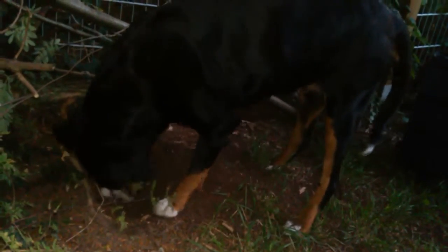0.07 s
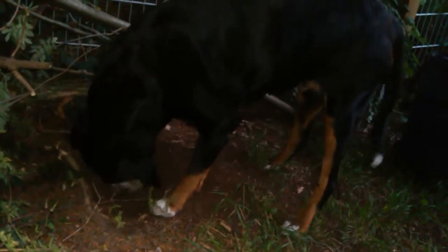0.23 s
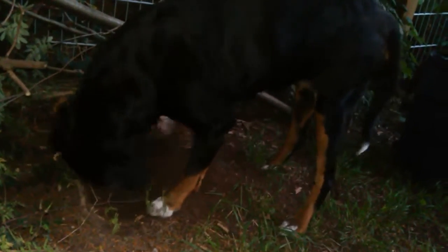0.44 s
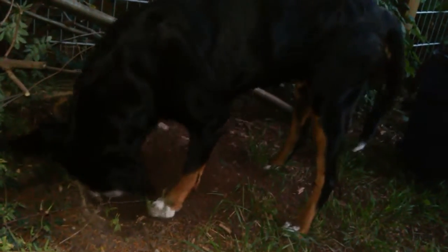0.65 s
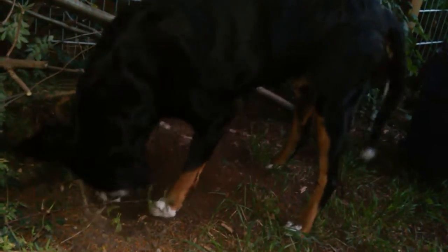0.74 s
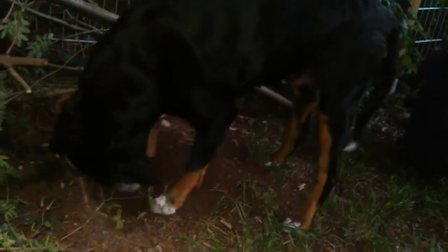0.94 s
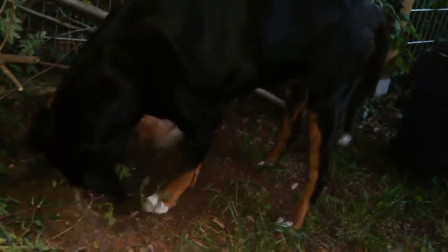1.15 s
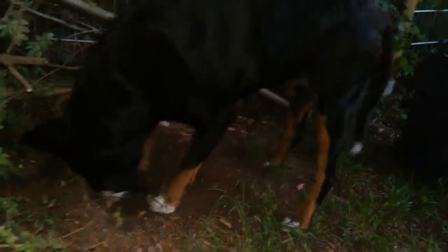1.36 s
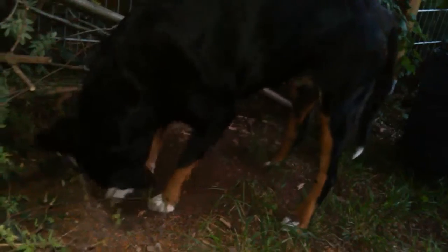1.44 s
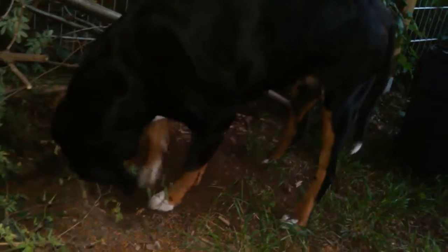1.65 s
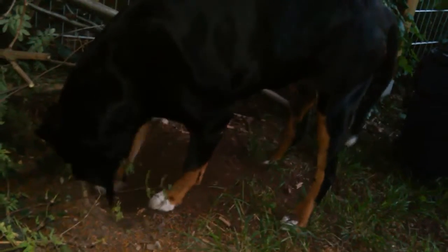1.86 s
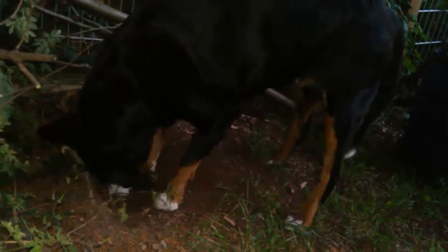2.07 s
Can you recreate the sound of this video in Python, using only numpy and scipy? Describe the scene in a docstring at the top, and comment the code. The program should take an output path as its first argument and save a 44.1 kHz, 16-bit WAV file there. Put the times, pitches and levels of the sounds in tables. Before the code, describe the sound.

A dog digs in dry soil, close by, over a faint outdoor rumble. At 0.2 seconds a paw thumps and rakes, spraying hissing grit; a twig snaps near 0.6. A pat at 0.7 leads into a lighter stroke with clinking gravel, ticking grains and more snaps. A harder rake comes around 1.6, its grit dying away before a paw settles and stalks crack at 2 seconds.

```python
"""A dog digs in dry garden soil, close by, outdoors, over a faint rumble.
A forepaw thumps in and rakes through the crumbs; grit sprays with a hiss and a twig snaps.
A paw pats the ground, then a lighter stroke drags up clinking gravel and more grit.
A second, harder rake follows; the last grains land, a paw settles and dry stalks snap."""
import sys
import numpy as np
from scipy import signal
from scipy.fft import rfft, irfft
from scipy.io import wavfile

SR = 44100
rng = np.random.default_rng(int(sys.argv[2]) if len(sys.argv) > 2 else 0)


def digitize_waveform(pressure):
    """Quantize a signal to 16-bit integers and store it at the path in sys.argv[1].

    Rows of a 2-D input are taken as channels; values are limited to [-1, 1].
    """
    field = np.atleast_2d(pressure).T
    bounded = np.clip(field, -1, 1)
    quanta = np.round(bounded * 32767).astype(np.int16)
    wavfile.write(sys.argv[1], SR, quanta)


N = 92610
T = np.arange(N) / SR


def from_db(db):
    """Decibels to gain."""
    return 10 ** (np.asarray(db) / 20)


def unit_rms(x):
    """Scale to unit power."""
    return x / np.sqrt(np.mean(x ** 2) + 1e-20)


def butter(x, order, hz, kind):
    """Butterworth filter."""
    return signal.sosfilt(signal.butter(order, hz, kind, fs=SR, output="sos"), x)


def colour(x, spectrum):
    """Minimum-phase filter with the given spectral shape and unit power gain."""
    hz, db = np.transpose(spectrum)
    size = 2 * N
    bin_hz = np.maximum(np.arange(N + 1) * SR / size, 1)
    gain = unit_rms(from_db(np.interp(np.log(bin_hz), np.log(hz), db)))
    cepstrum = irfft(np.log(gain))
    cepstrum[1:N] *= 2  # fold onto positive time
    cepstrum[N + 1:] = 0
    return irfft(rfft(x, size) * np.exp(rfft(cepstrum)))[:N]


def resonate(x, hz, width_hz):
    """One resonance, unit power gain for white noise."""
    r = np.exp(-np.pi * width_hz / SR)
    feedback = [1, -2 * r * np.cos(2 * np.pi * hz / SR), r * r]
    return signal.lfilter(np.sqrt((1 - r * r) / 2) * np.array([1, 0, -1]), feedback, x)


def bursts(rows, t60_s):
    """Envelope of decaying hits (time [s], level [dB])."""
    return sum((T >= s) * from_db(db - 60 * np.maximum(T - s, 0) / t60_s) for s, db in rows)


def strokes(rows, fade_db_per_s):
    """Envelope of paw strokes (start [s], rise [s], hold [s], level [dB]): bite, swell, hold, fade."""
    out = 0
    for start_s, rise_s, hold_s, db in rows:
        age_s = T - start_s
        bite = np.clip(age_s / 0.0048, 0, 1)
        swell_db = -8 * np.clip(1 - age_s / rise_s, 0, 1)
        fade_db = fade_db_per_s * np.maximum(age_s - rise_s - hold_s, 0)
        out += bite * from_db(db + swell_db - fade_db)
    return out


def impacts(per_s, spread_db, grain_s):
    """Power of random tiny impacts of uneven size; mean 1."""
    hits = rng.random(N) < per_s / SR
    energy = from_db(spread_db * np.minimum(rng.exponential(1, N), 4)) ** 2
    power = signal.lfilter([1], [1, -np.exp(-1 / (grain_s * SR))], hits * energy + 1e-12)
    return power / power.mean()


def grains(per_s, spread_db, grain_s, wide_share):
    """Crunch: some grains crack across all bands, the others sound in one."""
    edges_hz = [30, 700, 1500, 2700, 4200, 6000, 8000, 10000, 12000, 14000, 17000]
    wide = impacts(per_s, spread_db, grain_s)
    out = 0
    for band_hz in zip(edges_hz, edges_hz[1:]):
        narrow = impacts(per_s / 2, spread_db, 2 * grain_s)
        power = wide_share * wide + (1 - wide_share) * narrow
        out += butter(np.sqrt(power) * rng.standard_normal(N), 2, band_hz, "band")
    return unit_rms(out)


def ring(rows, modes):
    """Each contact (time [s], level [dB]) rings all modes, slightly varied in pitch and level."""
    out = np.zeros(N)
    for s, db in rows:
        age_s = np.maximum(T - s, 0)
        for hz, mode_db, t60_s in modes:
            pitch_hz = hz * rng.normal(1, .006)
            level_db = rng.normal(db + mode_db, 1)
            out += from_db(level_db - 60 * age_s / t60_s) * np.sin(2 * np.pi * pitch_hz * age_s)
    return out


# yard background: (frequency [Hz], relative density [dB])
YARD_SPECTRUM = [(20, 0), (45, -4), (100, 1.5), (170, -7.5), (300, -18), (1000, -21.5), (4000, -73),
                 (15000, -30)]

def yard():
    """Faint steady rumble."""
    return from_db(-58) * colour(rng.standard_normal(N), YARD_SPECTRUM)


def echo(x):
    """Brief scatter from ground and shrubs."""
    scatter = rng.standard_normal(N) * bursts([(.004, 0)], t60_s=0.13)
    return from_db(-13.5) * signal.fftconvolve(x, scatter / np.linalg.norm(scatter))[:N]


# earth sliding: (start [s], rise [s], hold [s], level [dB])
SLUMPS = [(0.23, 0.039, 0.097, -45), (0.798, 0.064, 0.18, -56), (1.585, .03, .05, -40)]
# sliding earth: (frequency [Hz], relative density [dB])
SLUMP_SPECTRUM = [(35, -5.5), (72, -1), (110, 4), (170, -8), (300, -18), (1500, -64)]

def slumps():
    """Loosened earth slumps with a low murmur."""
    return colour(strokes(SLUMPS, fade_db_per_s=131) * rng.standard_normal(N), SLUMP_SPECTRUM)


# paw falls: (time [s], scuff [dB], crumbs [dB])
STEPS = [(0.724, -42, -58), (0.736, -49.5, -60), (1.354, -53.5, -63), (1.972, -50.5, -51)]
# paw on soil: (frequency [Hz], relative density [dB])
SCUFF_SPECTRUM = [(100, -19), (230, 7.5), (370, -16), (550, 2.5), (780, -9.5), (1100, -18.5), (3000, -17.5)]
# breaking crumbs, also in rakes(): (frequency [Hz], relative density [dB])
CRUMB_SPECTRUM = [(150, -3.5), (400, 1), (750, 1), (1150, 0), (1800, -2.5), (2600, 1), (4200, -2.5),
                  (5000, -14), (6500, -3), (9000, -22.5), (15000, -32)]

def steps():
    """A settling paw scuffs the ground and crunches loose crumbs."""
    scuff = bursts([(s, db) for s, db, _ in STEPS], t60_s=.11) * rng.standard_normal(N)
    crunch = bursts([(s, db) for s, _, db in STEPS], t60_s=.2)
    crunch *= grains(per_s=420, spread_db=3, grain_s=0.00037, wide_share=0.28)
    return colour(scuff, SCUFF_SPECTRUM) + colour(crunch, CRUMB_SPECTRUM)


# twigs and stalks breaking: (time [s], body [Hz], body level [dB], crack [Hz], crack level [dB])
SNAPS = [(.149, 3350, -72, 4500, -55), (0.5804, 1680, -41, 3980, -37), (0.5797, 1800, -36, 5940, -35),
         (.7775, 1670, -28.5, 3200, -36), (0.8286, 1870, -34.5, 2500, -35),
         (1.0397, 3070, -34.5, 5730, -29.5), (1.534, 1030, -38.5, 3070, -37), (1.540, 990, -34, 1500, -44),
         (1.973, 734, -40.5, 1820, -43), (1.9749, 2670, -42.5, 4740, -42.5)]

def twigs():
    """Fibres break in a burst that rings in the twig's body and in a higher crack."""
    out = 0
    for s, body_hz, body_db, crack_hz, crack_db in SNAPS:
        fibres = bursts([(s, 0)], t60_s=.012) * rng.standard_normal(N)
        body = from_db(body_db) * resonate(fibres, body_hz, width_hz=200)
        crack = from_db(crack_db) * resonate(fibres, crack_hz, width_hz=.2 * crack_hz)
        out += butter(2 * (body + crack), 2, [body_hz / 2, 2 * crack_hz], "band")
    return out


# grain landings: (time [s], level [dB])
TICKS = [(.159, -37), (.3055, -17.5), (.466, -23), (1.021, -20), (1.088, -21.5), (1.116, -25),
         (1.319, -39.5), (1.348, -44), (1.829, -33), (1.917, -39), (1.974, -33)]
# landing grit, also in spray(): (frequency [Hz], relative density [dB])
GRIT_SPECTRUM = [(200, -24), (500, -17), (1200, -22.5), (1900, -15), (3500, -14), (5000, -15.5), (6500, -7),
                 (8000, -9.5), (9200, -4.5), (11500, 0), (13300, 3.5), (15700, -1.5)]

def ticks():
    """Larger grains land with a dry tick."""
    return colour(bursts(TICKS, t60_s=0.043) * rng.standard_normal(N), GRIT_SPECTRUM)


# flying grit: (time [s], level [dB])
SPRAY_ENVELOPE = [(0.01, -34), (0.13, -46.5), (0.22, -29.5), (0.46, -30.5), (0.47, -27), (0.5, -30.5),
                  (0.62, -40), (0.76, -30), (0.78, -25), (0.79, -26.5), (0.83, -21), (1.01, -32.5),
                  (1.03, -34), (1.05, -31.5), (1.15, -36), (1.2, -46), (1.29, -53.5), (1.35, -41.5),
                  (1.37, -44.5), (1.5, -33), (1.55, -26.5), (1.72, -21.5), (1.85, -43.5), (1.96, -53.5),
                  (2.0, -39.5), (2.09, -53.5)]

def spray():
    """Flung grit hisses on soil and leaves; coarser grains tick through."""
    s, db = np.transpose(SPRAY_ENVELOPE)
    envelope = from_db(np.interp(T, s, db) - 0.5)
    fine = grains(per_s=5400, spread_db=5.0, grain_s=0.0004, wide_share=0.52)
    coarse = np.sqrt(impacts(per_s=110, spread_db=4.5, grain_s=0.0002)) * rng.standard_normal(N)
    return colour((fine + from_db(-9.5) * coarse) * envelope, GRIT_SPECTRUM)


# claws through gravel: (start [s], rise [s], hold [s], level [dB])
GRAVEL_STROKES = [(0.789, 0.037, 0.016, -25), (0.874, .005, .008, -38.5), (0.918, 0.0076, 0.0099, -33.5),
                  (1.002, .006, .01, -38.5), (1.438, .008, .008, -55), (1.496, .008, 0.014, -38.5)]
# rattling gravel: (frequency [Hz], relative density [dB])
GRAVEL_SPECTRUM = [(300, -38), (700, -15), (1200, -23), (1750, 1), (2500, -0.5), (4000, -7), (5200, 1.5),
                   (6500, 6.5), (7800, -5.5), (9200, 10.5), (12000, 5.5), (15500, -4.5)]
# pebble contacts: (time [s], level [dB])
CLINKS = [(.7685, -13), (.776, -13), (.7829, -3.5), (.809, -13), (.8275, -11.5), (.8453, -5.5), (.901, -29)]
# pebble resonances: (frequency [Hz], level [dB], t60 [s])
PEBBLE_MODES = [(6530, -5, .018), (9200, -0.5, 0.011), (10150, -6, 0.01), (11020, -7, 0.018),
                (14950, -8, 0.02)]

def gravel(clink_rise_s=0.00022):
    """Gravel rattles under the claws; single pebbles clink."""
    drag = strokes(GRAVEL_STROKES, fade_db_per_s=190)
    rattle = drag * grains(per_s=420, spread_db=3.5, grain_s=0.00047, wide_share=0.5)
    clinks = sum(np.clip((T - s) / clink_rise_s, 0, 1) * ring([(s, db)], PEBBLE_MODES)
                 for s, db in CLINKS)
    return colour(rattle, GRAVEL_SPECTRUM) + butter(clinks, 3, 5000, "high")


# deep paw strokes: (start [s], rise [s], hold [s], thud [dB], crumbs [dB])
RAKES = [(0.181, 0.024, 0.04, -28.5, -33), (1.546, 0.028, 0.033, -25.5, -28.5)]
# pounded earth: (frequency [Hz], relative density [dB])
THUD_SPECTRUM = [(40, -51.5), (90, -10), (160, -3), (250, 7.5), (360, -9.5), (480, -17.5), (1000, -11),
                 (3000, -35.5)]
# clods giving way: (time [s], thud [dB], crumbs [dB])
CLODS = [(0.2128, -25.5, -26.5), (.247, -30.5, -34), (1.5926, -25, -26.5), (1.616, -18.5, -50),
         (1.651, -30.5, -41), (1.666, -31.5, -30)]
# ground resonances round the hole: (frequency [Hz], level [dB], t60 [s])
GROUND_MODES = [(175, -5, 0.041), (241.6, -3.5, 0.056), (329, -1.5, 0.12), (374, -9.5, 0.15),
                (522, -7, 0.13)]

def rakes():
    """The paw pounds the earth, clods give way and the claws break them into crumbs."""
    clods = ring([(s, db) for s, db, _ in CLODS], GROUND_MODES)
    thud = strokes([(*timing, db) for *timing, db, _ in RAKES], fade_db_per_s=238)
    thud *= rng.standard_normal(N)
    crumbs = strokes([(*timing, db) for *timing, _, db in RAKES], fade_db_per_s=105.5)
    crumbs += bursts([(s, db) for s, _, db in CLODS], t60_s=0.021)
    crumbs *= grains(per_s=1300, spread_db=2, grain_s=0.0005, wide_share=0.48)
    return colour(thud, THUD_SPECTRUM) + butter(clods, 2, 130, "high") + colour(crumbs, CRUMB_SPECTRUM)


def scene():
    """Digging, its echo and the yard; mono."""
    digging = spray() + rakes() + steps() + slumps() + gravel() + twigs() + ticks()
    return (digging + echo(digging) + yard())[None]


def record(dry):
    """Soft peak limit, then a steep low-pass."""
    peak_limit, cutoff_hz = .92, 15850
    rounded = dry / (1 + (dry / peak_limit) ** 6) ** (1 / 6)
    return signal.sosfilt(signal.ellip(12, .1, 90, cutoff_hz, fs=SR, output="sos"), rounded)


dry = scene()
out = record(dry)
digitize_waveform(out)
```